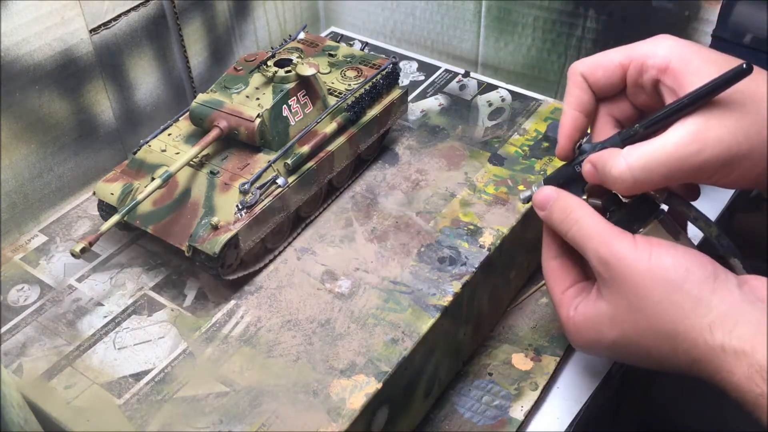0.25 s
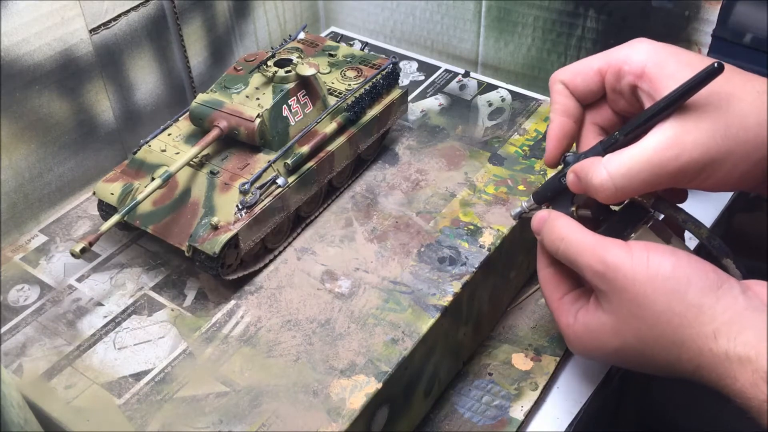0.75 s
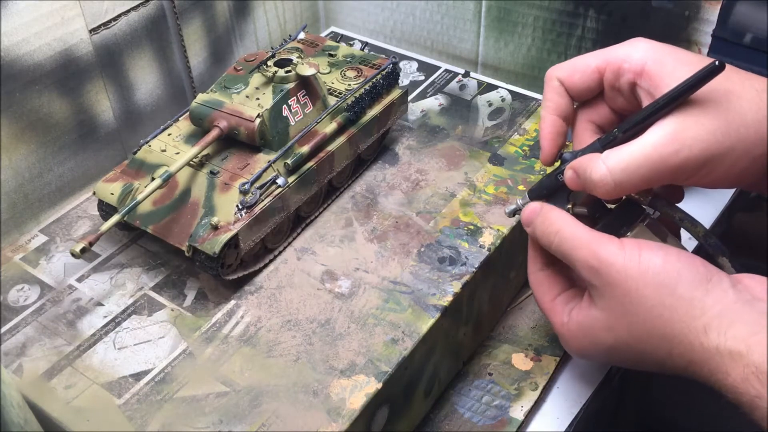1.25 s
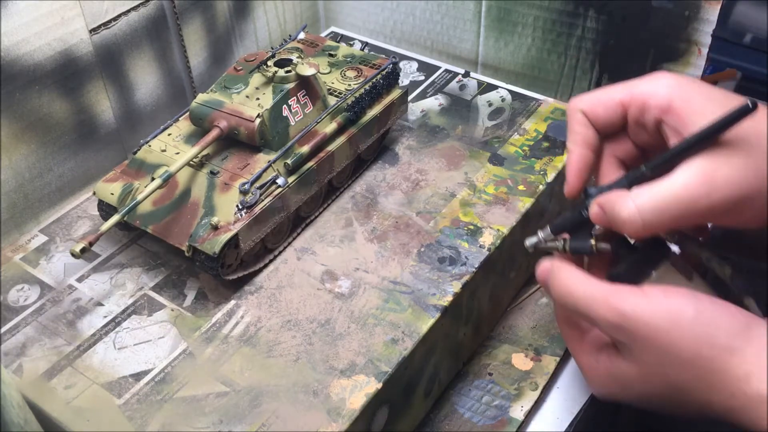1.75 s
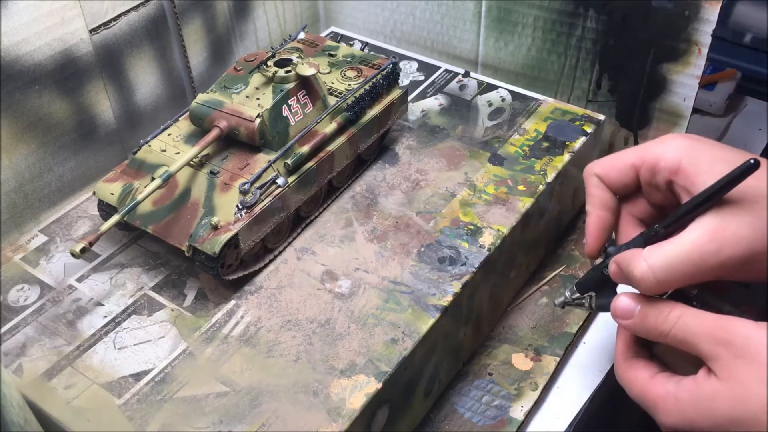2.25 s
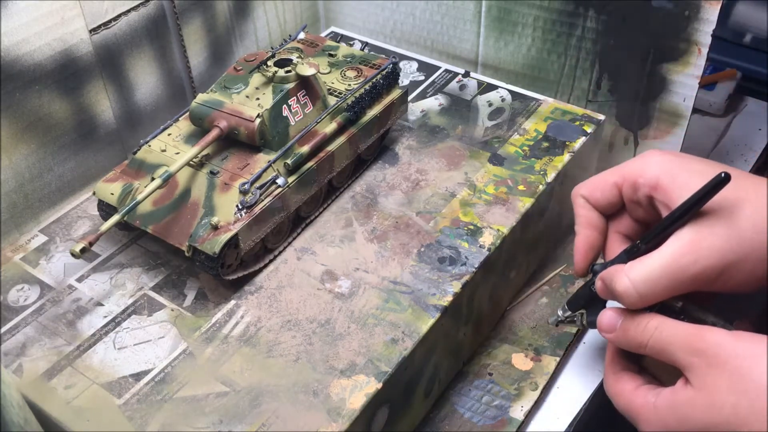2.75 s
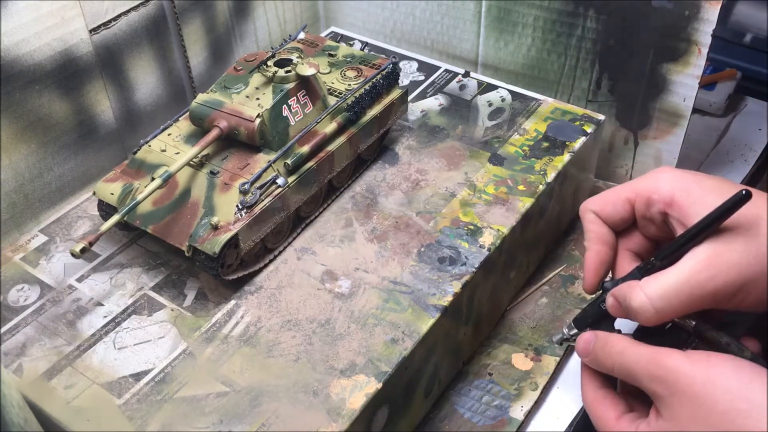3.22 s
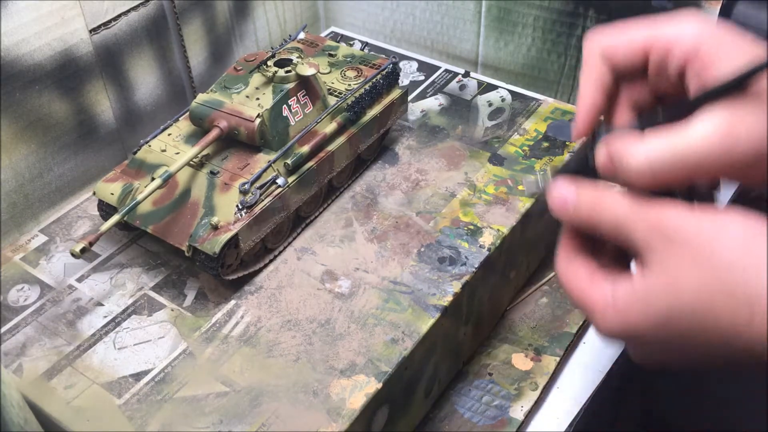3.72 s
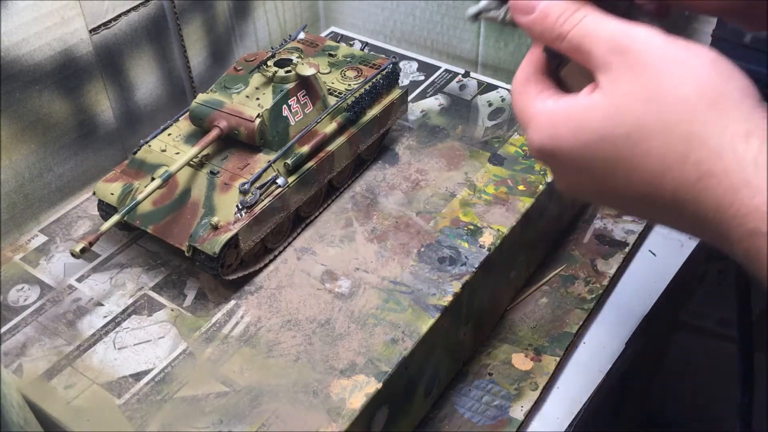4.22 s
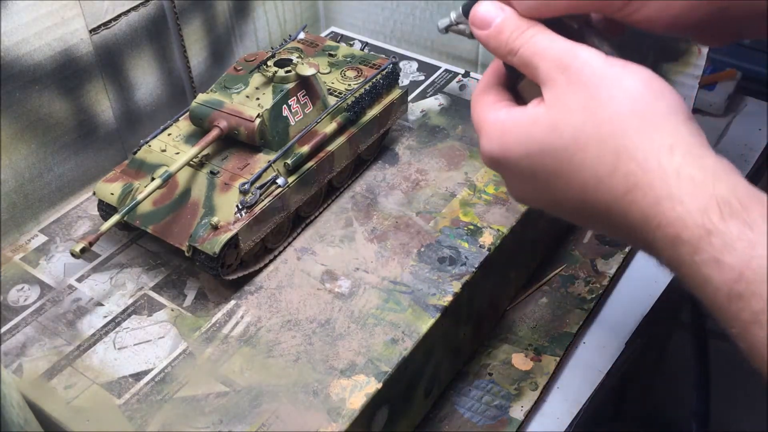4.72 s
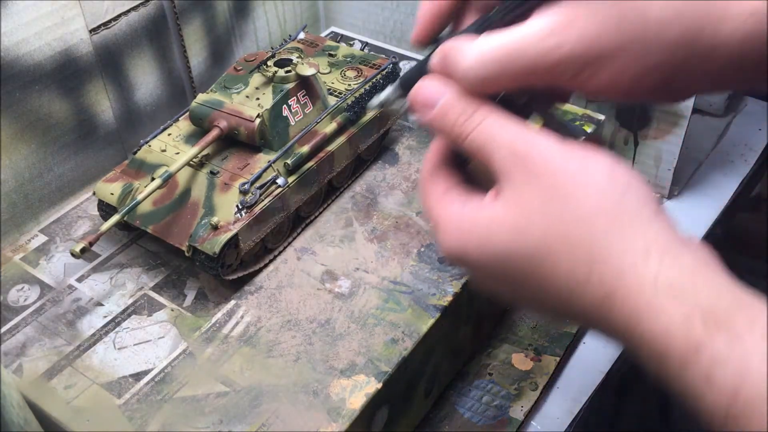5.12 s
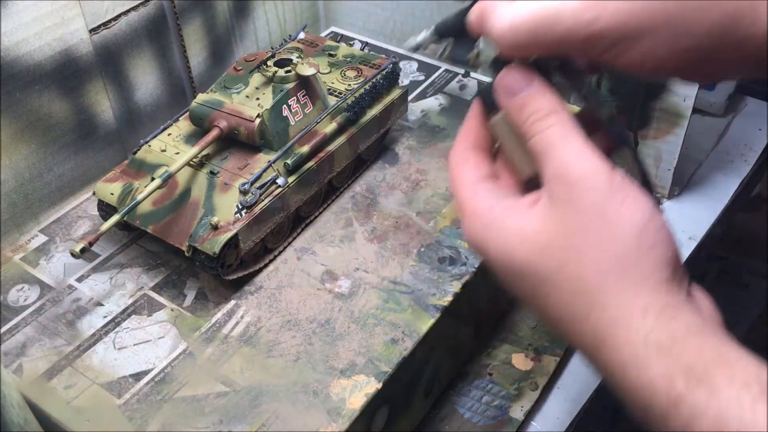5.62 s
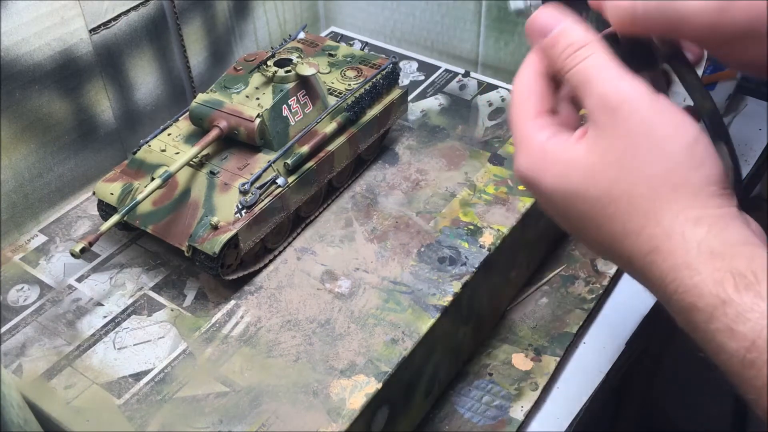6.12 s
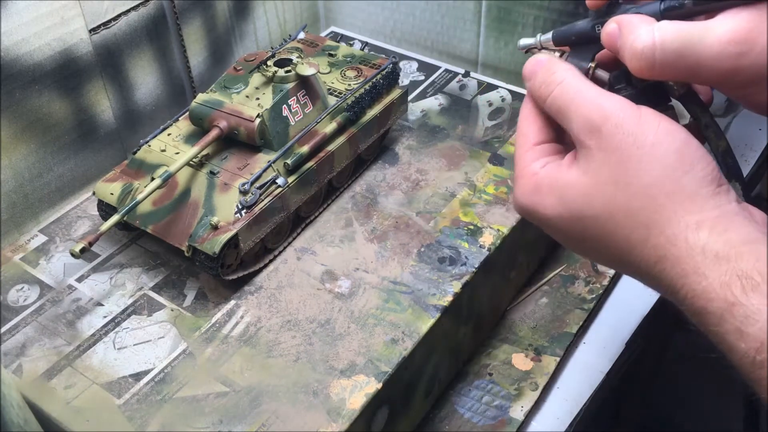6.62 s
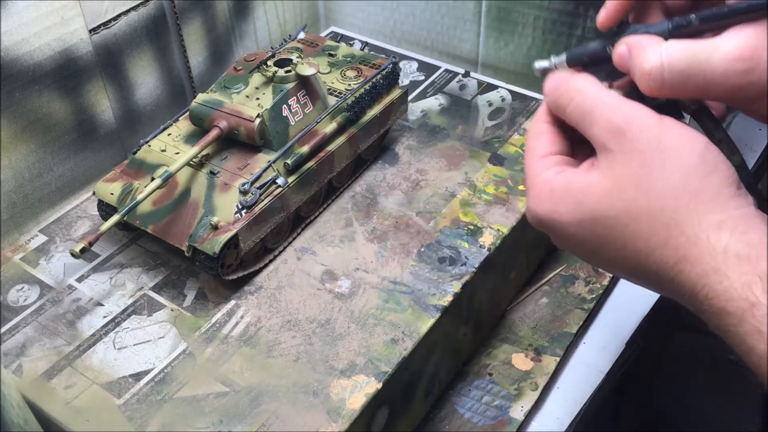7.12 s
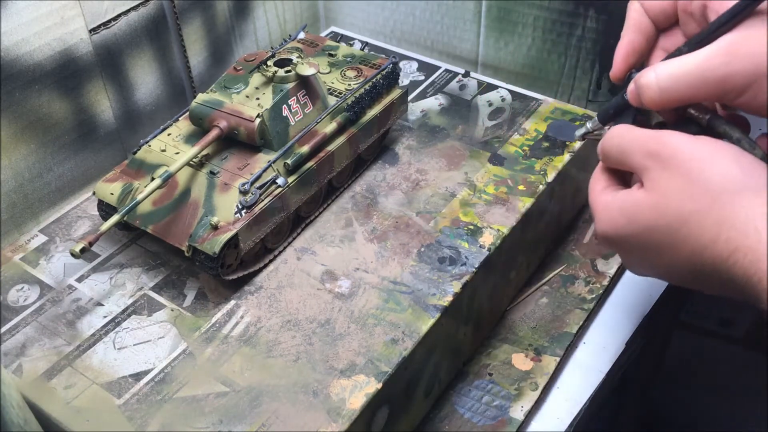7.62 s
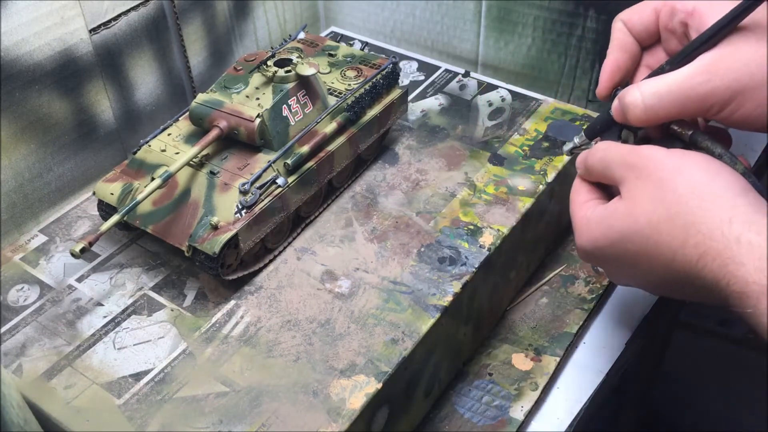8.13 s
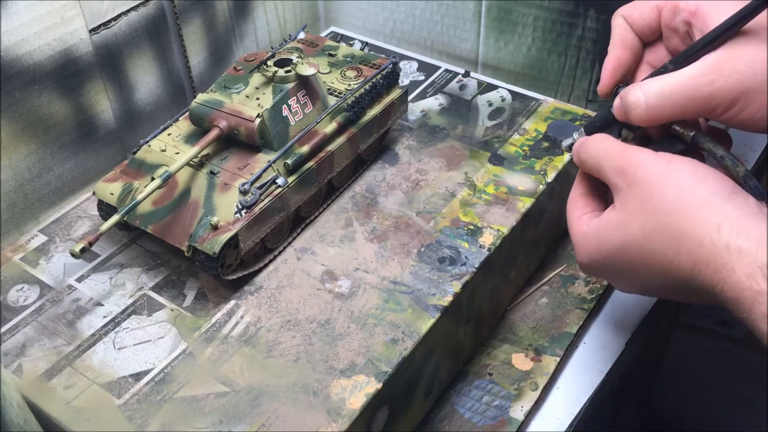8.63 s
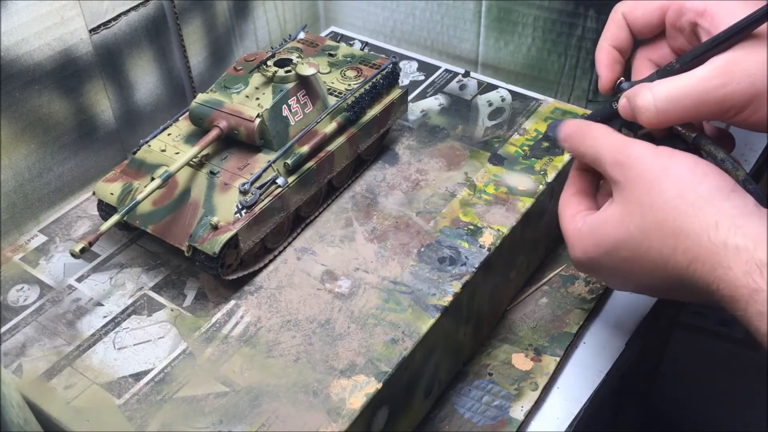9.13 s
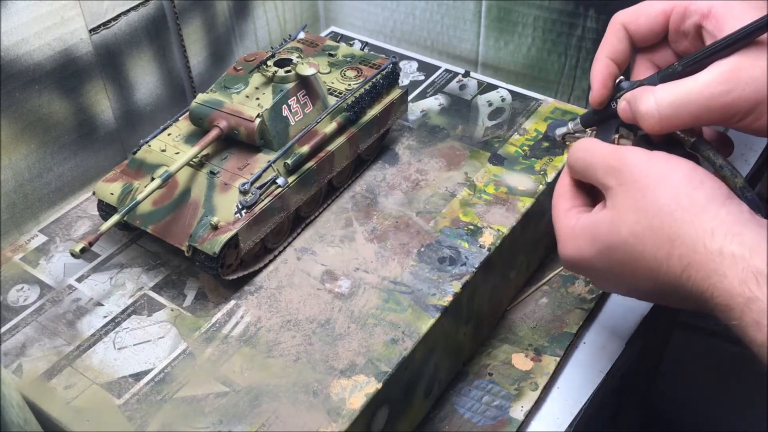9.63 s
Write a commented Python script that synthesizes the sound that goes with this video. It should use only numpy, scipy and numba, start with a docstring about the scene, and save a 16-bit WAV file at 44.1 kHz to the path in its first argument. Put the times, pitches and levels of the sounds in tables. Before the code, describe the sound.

Close to the microphone at an indoor workbench, an airbrush hisses five times: two short spurts, a medium burst, a long sweeping spray and a final medium burst. Each is a sharp, high hiss with a soft rush of air hitting the bench. Underneath and in the gaps, a small compressor keeps humming, chugging rapidly and rattling faintly over a low wash of room noise.

```python
"""Airbrush at a hobby bench

A small piston compressor thumps, hums and rattles over a wash of room noise, close to a mono mic.
An airbrush hisses in five bursts, coloured by reflections from the bench as the nozzle sweeps.
The motor slows a little whenever air is drawn, and gain control ducks the mix under each burst."""
import sys
import numpy as np
from scipy import signal
from scipy.fft import rfft, irfft, next_fast_len
from scipy.io import wavfile
from scipy.ndimage import uniform_filter1d
from numba import njit

SR = 44100
rng = np.random.default_rng(int(sys.argv[2]) if len(sys.argv) > 2 else 0)


def output_pcm(signal):
    """Save a mono or channel-first signal as 16-bit PCM at the path in sys.argv[1].

    Samples are clipped to [-1, 1] before scaling.
    """
    pcm = np.clip(np.atleast_2d(signal).T, -1, 1) * 32767
    wavfile.write(sys.argv[1], SR, np.round(pcm).astype(np.int16))


N = 434826
TIME = np.arange(N) / SR
PADDED = next_fast_len(N)
BINS = np.fft.rfftfreq(PADDED, 1 / SR)

# tones of the piston stroke and the ringing housing: multiple of the crank speed, level/dB
CRANK_TONES = [(1, -67.5), (2, -52.3), (3, -43.6), (4, -65.5), (5, -44.3), (6, -51.1), (7, -49.3),
               (8, -61.4), (9, -62.0), (10, -56.0), (11, -56.4), (12, -67.0), (13, -61.7), (14, -59.7),
               (15, -65.1), (17, -64.5), (18, -68.7), (31, -58.3), (32, -62.8), (35, -61.8), (36, -61.9),
               (43, -63.1), (44, -56.1), (45, -53.1), (46, -57.0), (47, -64.8), (48, -54.8), (49, -59.9),
               (62, -63.3), (68, -55.9), (70, -62.1), (97, -64.8)]
# where the two compressor valves slap shut: crank position/turns
VALVE_SLAPS = [.02, .309]
# drift of the housing rings as the arms move: t/s, level/dB near 930, 1300 and 1950 Hz
RING_DRIFT = [(0, 2, -2, 3), (1.65, 1.5, -2, 3), (1.95, -2, 1, -3.5), (3.3, -1, 5, -2),
              (3.9, 0.5, -1.5, 0.5), (5.4, 1, -0.5, 2.5), (6.9, 0.5, -1.5, -1.5), (9.86, 1, -1.5, -1)]
# magnetic hum, swayed by the crank: sideband number, level/dB
HUM_SIDEBANDS = [(-1, -56.5), (0, -60), (1, -47.5), (2, -69), (3, -61.5)]
# noisy rings within each turn: crank position/turns, decay/turns, f/Hz, width/Hz, level/dB
RATTLE_RINGS = [(.0, 0.9, 935, 145, -50), (0.875, 0.75, 1335, 106, -53), (0.256, 0.3, 1346, 100, -56),
                (0.836, 1, 1750, 36, -53), (0.873, 0.73, 1957, 120, -53), (0.285, 0.45, 4034, 234, -58.5),
                (0.94, 1, 5330, 390, -57.5), (0.83, 1, 6430, 330, -60), (0.86, 0.3, 7030, 360, -59)]
# tone of the room: f/Hz, relative level/dB
ROOM_SPECTRUM = [(20, -18), (55, 0.5), (160, 11), (320, -2), (600, -1.5), (1050, -2), (2200, 0), (2600, -5),
                 (4400, -2.5), (4800, -9), (7400, -4.5), (8200, -14.5), (12000, -10), (15700, -10)]
# trigger presses: open t/s, shut t/s, rise/s, fall/s, top hiss level/dB before trim,
# lower hiss level/dB relative to the top, bench rush level/dB
TRIGGER_PRESSES = [(0.803, 0.957, 0.028, .019, -26, -12, -46), (1.132, 1.28, .015, .026, -25.5, -11, -43.5),
                   (2.626, 3.456, 0.036, 0.022, -27, -13, -43.5),
                   (4.133, 6.122, 0.0081, 0.023, -25.5, -13, -43),
                   (7.902, 8.826, 0.015, .026, -26, -11.5, -44)]
# tone of the nozzle: f/Hz, relative level/dB
HISS_SPECTRUM = [(1300, -39), (2300, -22), (3200, -18), (4200, -18), (5000, -19), (6000, -14.5),
                 (8000, -14.5), (9800, -10), (10500, -9.5), (12000, -3), (13500, -1), (15300, 1.5)]
# sweep of the hand over the bench: t/s, offset/mm
HAND_SWEEP = [(.8, 0), (1.3, 4), (2.6, -62), (3, -74), (3.3, -100), (4.13, 105), (4.42, 135), (4.7, 60),
              (5.15, 88), (5.36, 155), (5.52, 150), (5.68, 55), (5.87, 115), (6.13, 95), (7.9, 8),
              (8.84, 0)]
# treble swing as the brush turns towards and away from the mic: t/s, level/dB
TREBLE_SWING = [(1.3, -1), (2.65, 0), (2.92, 0.5), (3.16, -2), (3.44, 1), (4.18, .3), (4.33, -1), (4.54, 0),
                (4.77, -2.5), (4.88, -0.5), (5.42, -.4), (5.65, 1.5), (5.93, -1), (6, 0.5), (6.1, -2),
                (7.92, -0.5), (8.12, -1), (8.8, .7)]
# bands that the bench reinforces: f/Hz with the hand centred, nominal boost/dB
BENCH_BANDS = [(3150, 2), (4300, 2), (6550, 2.5), (9850, 6.3), (14400, 6), (16900, 5.5)]
# those bands weaken as the nozzle leaves the bench: offset/mm, share of the boost
BAND_STRENGTH = [(-70, .45), (0, 1)]
# tone of air landing on the bench: f/Hz, relative level/dB
RUSH_SPECTRUM = [(60, -1), (180, 4), (350, 2.5), (550, 0.5), (1000, 2), (1600, 1), (2400, -4), (4000, -22),
                 (9000, -49)]
# hollows at the bench rim and the workpiece: offset/mm, reach/mm, f/Hz, width/Hz, level/dB
BLOWN_HOLLOWS = [(-68, 28, 1320, 640, -41.5), (150, 40, 6000, 520, -38)]

FIELD_HZ = 30  # rotating field of the motor; the crank runs a little slower
RING_FROM_HZ = 700  # crossover from thump to housing ring


def amp(db):
    """Decibels to gain."""
    return 10 ** (np.asarray(db) / 20)


def unit_rms(x):
    """Scales to rms 1."""
    return x / np.sqrt(np.mean(x ** 2) + 1e-20)


def curves(rows, t):
    """Every column of an automation table at the times t."""
    times, *columns = np.transpose(rows)
    return [np.interp(t, times, column) for column in columns]


def eq_curve(points, hz):
    """Gain through EQ points joined on a log-frequency axis."""
    f, db = np.transpose(points)
    return amp(np.interp(np.log(hz + 1), np.log(f), db))


def bell(x, centre, width):
    """Bell curve with a peak of 1."""
    return 1 / (1 + ((x - centre) / (.78 * width)) ** 2)


def coloured(x, gain):
    """x with the given gain at each frequency, at rms 1."""
    return unit_rms(irfft(rfft(x, PADDED) * gain, PADDED)[:N])


def noise(gain):
    """Fresh noise of rms 1 with the given gain at each frequency."""
    return coloured(rng.standard_normal(N), gain)


def crank_noise(gain, turns, looped_share):
    """Fresh noise blended with a loop that comes round on every crank turn, at rms 1."""
    loop = signal.resample(rng.standard_normal(1500), 12000)
    looped = loop[(turns % 1 * len(loop)).astype(int)]
    fresh = rng.standard_normal(N)
    return coloured(np.sqrt(looped_share) * looped + np.sqrt(1 - looped_share) * fresh, gain)


def air_demand(rise_s, ease_s, delay_s=.087):
    """Draw on the air line, 0-1: starts full, builds late under the trigger and eases after it."""
    demand = np.exp(-TIME / ease_s)
    for on, off, *_ in TRIGGER_PRESSES:
        held = np.clip(TIME - delay_s - on, 0, off - on)
        rested = np.maximum(TIME - delay_s - off, 0)
        demand += (1 - demand) * (1 - np.exp(-held / rise_s)) * np.exp(-rested / ease_s)
    return demand


def piston_thump(turns, effort, tank_hz=192, tank_width_hz=32, tank_lag_rad=4):
    """One thump a turn, heavier in the bass under load; the air tank answers late where it rings."""
    out = np.zeros(N)
    for order, db in CRANK_TONES:
        hz = order * FIELD_HZ
        if hz < RING_FROM_HZ:
            gain = amp(db) * (effort if hz < 250 else 1)
            lag = tank_lag_rad * bell(hz, tank_hz, tank_width_hz) ** 2
            lag += rng.uniform(-1.5, 1.5) * (hz > 220)  # the room scatters the shorter waves
            out -= np.sqrt(2) * gain * np.cos(2 * np.pi * order * turns - lag)
    return out


def housing_gain(hz, emptied, tick_full_db=6.5, tick_empty_db=-5):
    """Level ride at hz: the rings drift, and the ticking near 4 kHz follows the line pressure."""
    t = TIME[::256]
    tick_db = tick_full_db + (tick_empty_db - tick_full_db) * np.interp(t, TIME, emptied)
    rides_db = curves(RING_DRIFT, t) + [tick_db]
    bands = [bell(hz, 930, 250), bell(hz, 1300, 400), bell(hz, 1950, 400), bell(hz, 3900, 1100)]
    return np.interp(TIME, t, amp(sum(db * band for db, band in zip(rides_db, bands))))


def housing_ring(turns, effort, emptied, waver):
    """The housing rings after both valve slaps in wavering tones, a little softer under load."""
    out = np.zeros(N)
    for order, db in CRANK_TONES:
        hz = order * FIELD_HZ
        if hz >= RING_FROM_HZ:
            gain = amp(db) / effort ** .16 * housing_gain(hz, emptied)
            gain *= 1 + np.roll(waver, rng.integers(N))
            lag = np.angle(np.exp(2j * np.pi * order * np.array(VALVE_SLAPS)).sum())
            out -= np.sqrt(2) * gain * np.cos(2 * np.pi * order * turns - lag)
    return out


def motor_hum(turns, effort, hum_hz=120.015):
    """Magnetic hum with sidebands from the crank; it beats against the thump."""
    tones = sum(amp(db) * np.cos(2 * np.pi * (hum_hz * TIME + side * turns))
                for side, db in HUM_SIDEBANDS)
    return np.sqrt(2) * effort * tones


def rattle(turns, emptied):
    """Noisy rings struck once a turn; the high ones repeat almost exactly."""
    out = np.zeros(N)
    for position, decay, hz, width_hz, db in RATTLE_RINGS:
        since_strike = (turns - position) % 1
        envelope = unit_rms(uniform_filter1d(np.exp(-since_strike / decay), size=80))
        ring = crank_noise(bell(BINS, hz, width_hz), turns, looped_share=.98 if hz > 3000 else .48)
        out += amp(db) * housing_gain(hz, emptied) * envelope * ring
    return out


def intake_fizz(turns, level_db=-57):
    """Air fizzing through the intake in time with the crank."""
    return amp(level_db) * crank_noise(bell(BINS, 10300, 7100), turns, looped_share=.95)


def compressor(idle_slip_hz=1.4334, load_slip_hz=.477, load_db=1.7, start_turns=.3805):
    """The motor lags its field; drawing air drags it down further and makes the stroke heavier."""
    load = air_demand(rise_s=.066, ease_s=.26)
    emptied = air_demand(rise_s=.24, ease_s=.84)  # the line drains in a burst, then refills
    crank_hz = FIELD_HZ - (idle_slip_hz + load_slip_hz * load)
    turns = start_turns + np.cumsum(crank_hz) / SR
    effort = amp(load_db * load)
    waver = .42 * noise(bell(BINS, 0, 5.1))
    tones = piston_thump(turns, effort) + housing_ring(turns, effort, emptied, waver)
    return tones + motor_hum(turns, effort) + rattle(turns, emptied) + intake_fizz(turns)


def room_tone(level_db=-47):
    """A steady, dark wash of room noise."""
    return amp(level_db) * noise(eq_curve(ROOM_SPECTRUM, BINS))


def latest_press(t):
    """Seconds since the latest trigger press, and its three levels, at the times t."""
    on, _, rise, _, *levels = np.transpose(TRIGGER_PRESSES)
    row = np.maximum(np.searchsorted(on - 2 * rise, t) - 1, 0)
    return [np.maximum(t - on[row], 0)] + [level[row] for level in levels]


def trigger_valve():
    """Share of the full air flow that the trigger lets through."""
    flow = np.zeros(N)
    for on, off, rise, fall, *_ in TRIGGER_PRESSES:
        ramp = 1 + np.minimum((TIME - on) / rise, (off - TIME) / fall)
        flow += np.clip(ramp, 0, 1) ** 2
    return flow


def reflection_comb(hz, sweep_mm, count=9, strength=.9, diffuse=.15, sound_mm_per_s=343e3):
    """Comb filter from echo paths that move with the hand; diffuse sound fills the notches."""
    paths_mm = np.geomspace(380, 1500, count) * rng.uniform(.9, 1.1, count)
    slants = rng.choice([-1, 1], count) * rng.uniform(.6, 1.6, count)
    echoes = sum(np.exp(-2j * np.pi * hz * (mm + slant * sweep_mm) / sound_mm_per_s)
                 for mm, slant in zip(paths_mm, slants))
    echoes *= np.minimum(hz / 7000, 1)  # small surfaces reflect only short waves
    return np.sqrt(diffuse + abs(1 + strength * echoes / np.sqrt(count)) ** 2)


def bench_colour(hz, sweep_mm, distance_mm=228):
    """Bands boosted by the bench, with cancelling flanks; they sink as the path to it lengthens."""
    strength, = curves(BAND_STRENGTH, sweep_mm)
    stretch = np.hypot(distance_mm, sweep_mm) / distance_mm
    boost_db = 0
    for centre_hz, db in BENCH_BANDS:
        width_hz = 700 * np.sqrt(centre_hz / 10000)
        band = bell(hz, centre_hz / stretch, width_hz)
        flanks = bell(hz, centre_hz / stretch, 2.2 * width_hz)
        boost_db += strength * db * (band - .33 * flanks)
    return amp(boost_db)


def nozzle_hiss(trim_db=5, flutter=.071):
    """Bright, fluttering turbulence at the nozzle, coloured by the moving reflections."""
    hz, t, white = signal.stft(rng.standard_normal(N), SR, nperseg=512, noverlap=384)
    hz = hz[:, None]
    _, top_db, lower_db, _ = latest_press(t)
    swing_db, = curves(TREBLE_SWING, t)
    sweep_mm = uniform_filter1d(curves(HAND_SWEEP, t)[0], size=40)
    gain = eq_curve(HISS_SPECTRUM, hz) * reflection_comb(hz, sweep_mm) * bench_colour(hz, sweep_mm)
    top = np.linalg.norm(gain * ((hz > 9000) & (hz < 15700)), axis=0)
    lower = np.linalg.norm(gain * ((hz > 4500) & (hz < 9000)), axis=0)
    # the treble is beamed, so the balance shifts as the brush turns
    balance_db = lower_db - swing_db - 20 * np.log10(lower / top)
    balance_shape = np.interp(hz, [2500, 4940, 8500, 10900], [.39, .68, 1, .19])
    gain *= amp(top_db + swing_db + balance_db * balance_shape) / top
    _, jet = signal.istft(white * gain * np.sqrt(len(hz)), nperseg=512, noverlap=384)
    return amp(trim_db) * jet[:N] * (1 + flutter * noise(bell(BINS, 0, 250)))


def bench_rush(fade_db=5, fade_s=1, wander_db=1.75, rim_db=-54):
    """Air landing on the bench: a rush that fades through each press, plus a steady midrange band."""
    age, *_, level_db = latest_press(TIME)
    level_db -= fade_db * (1 - np.exp(-age / fade_s))
    level_db += wander_db * noise(bell(BINS, 0, 2.4))
    rush = amp(level_db) * noise(eq_curve(RUSH_SPECTRUM, BINS))
    return rush + amp(rim_db) * noise(bell(BINS, 1250, 550) ** 2.1)


def hollows():
    """Breathy resonances that swell as the jet passes over each hollow."""
    sweep_mm, = curves(HAND_SWEEP, TIME)
    out = np.zeros(N)
    for offset_mm, reach_mm, hz, width_hz, db in BLOWN_HOLLOWS:
        nearness = bell(sweep_mm, offset_mm, reach_mm) ** 2
        out += amp(db) * nearness * noise(bell(BINS, hz, width_hz) ** 2)
    return out


def airbrush():
    """The three layers of the air jet, gated by the trigger."""
    return trigger_valve() * (bench_rush() + hollows() + nozzle_hiss())


def spray_booth(x, tail_db=-22, t60_s=.19, echoes_per_s=4000, predelay_s=.006):
    """Adds a faint, short tail from the walls of the spray booth."""
    t = np.arange(SR // 3) / SR
    taps = rng.choice([-1., 1.], len(t)) * (rng.random(len(t)) < echoes_per_s / SR)
    tail = taps * (t > predelay_s) * amp(-60 * t / t60_s)
    return x + signal.oaconvolve(x, amp(tail_db) * tail / np.linalg.norm(tail))[:N]


def scene():
    """Airbrush, compressor and room, the same in both channels."""
    mono = spray_booth(airbrush()) + compressor() + room_tone()
    return np.array([mono, mono])


@njit
def ducking(want_db, start_db, attack_s, hold_s, release_s):
    """Gain reduction in dB that rises quickly, holds, then recovers."""
    out, now_db, wait = np.empty(len(want_db)), start_db, hold_s * SR
    for i, target_db in enumerate(want_db):
        if target_db >= now_db - .1 and target_db > 0:
            now_db += (target_db - now_db) / (attack_s * SR)
            wait = hold_s * SR
        elif wait > 0:
            wait -= 1
        else:
            now_db += (target_db - now_db) / (release_s * SR)
        out[i] = now_db
    return out


def record(dry, threshold_db=-33, depth_db=5.0, cutoff_hz=15850):
    """Gain control, turned down at first, ducks the mix under loud hiss; then a steep high cut."""
    power_db = 10 * np.log10(abs(uniform_filter1d(dry[0] ** 2, size=400)) + 1e-12)
    want_db = np.clip(power_db - threshold_db, 0, depth_db)
    duck_db = ducking(want_db, start_db=depth_db, attack_s=.051, hold_s=.098, release_s=.094)
    high_cut = signal.firwin(701, cutoff_hz, window=("kaiser", 9), fs=SR)
    return signal.oaconvolve(dry / amp(duck_db), high_cut[None], "same")


dry = scene()
out = record(dry)
output_pcm(out)
```